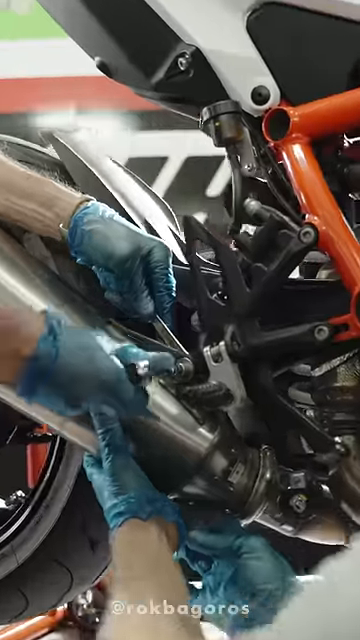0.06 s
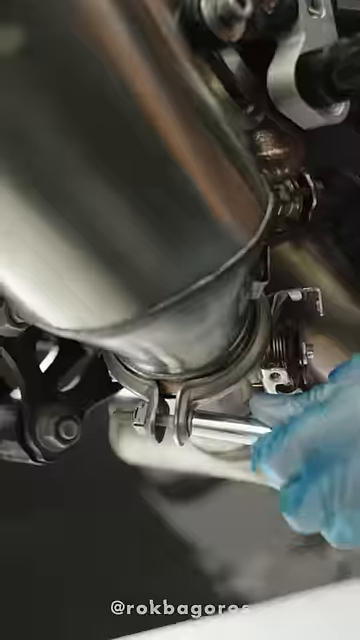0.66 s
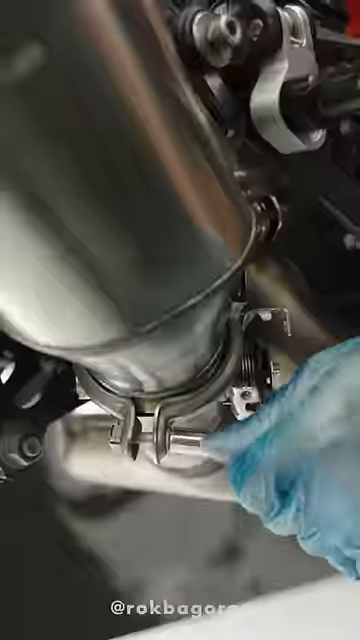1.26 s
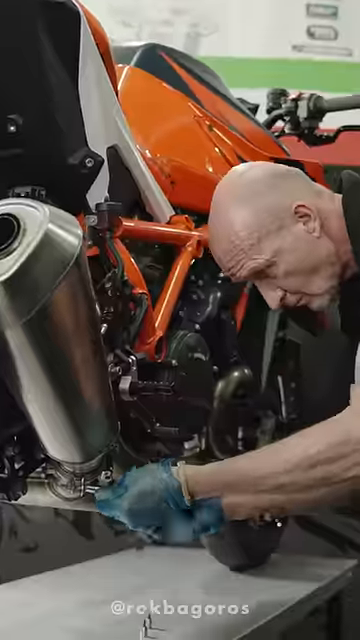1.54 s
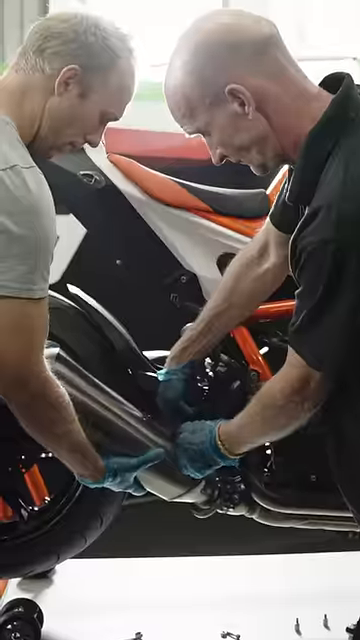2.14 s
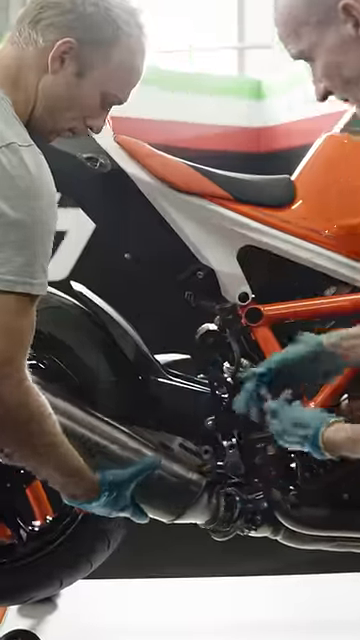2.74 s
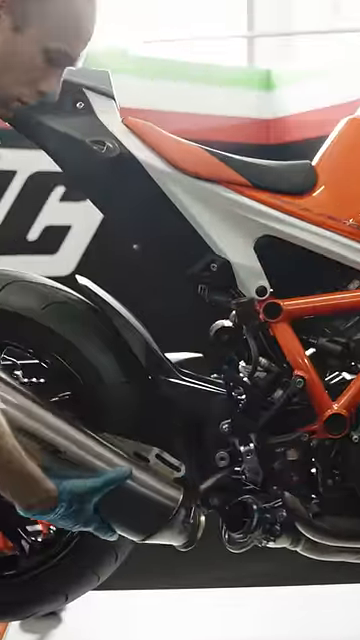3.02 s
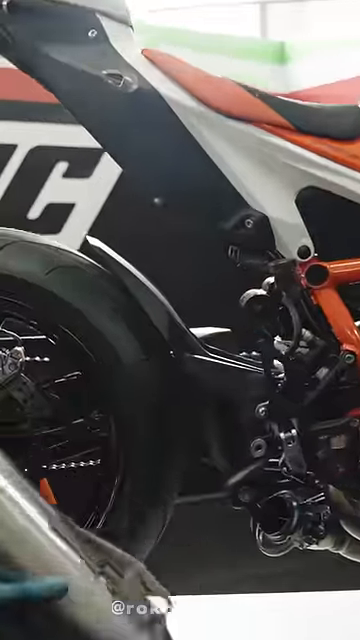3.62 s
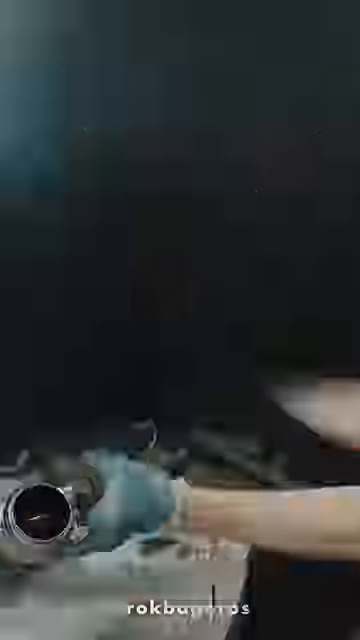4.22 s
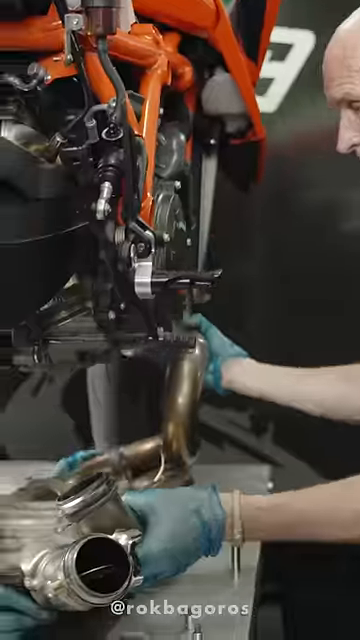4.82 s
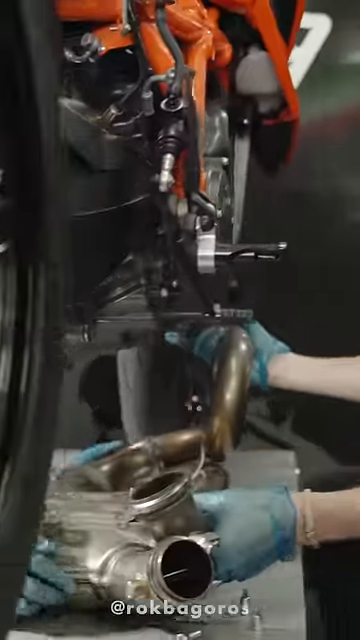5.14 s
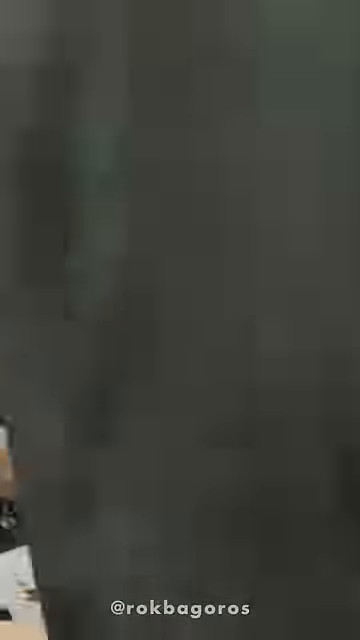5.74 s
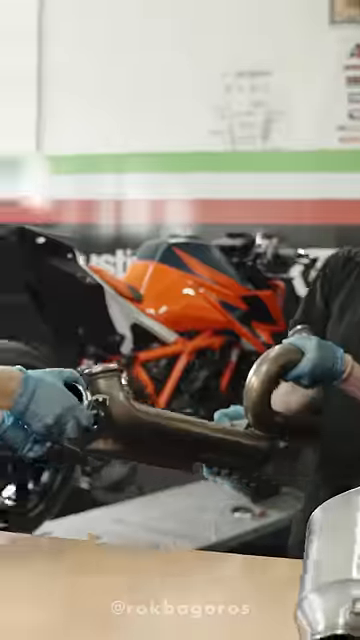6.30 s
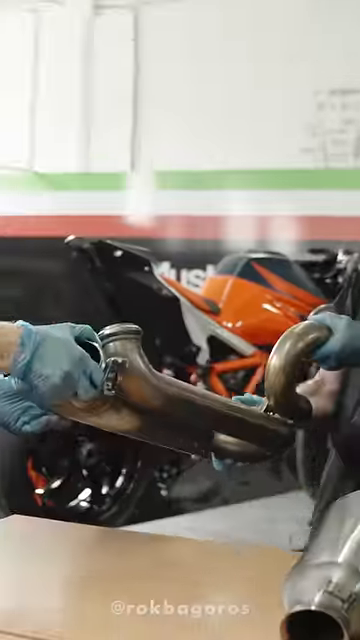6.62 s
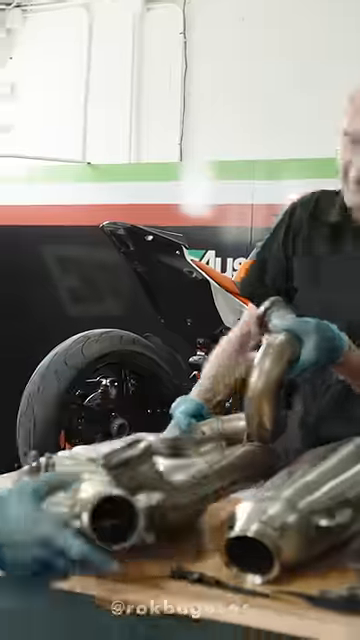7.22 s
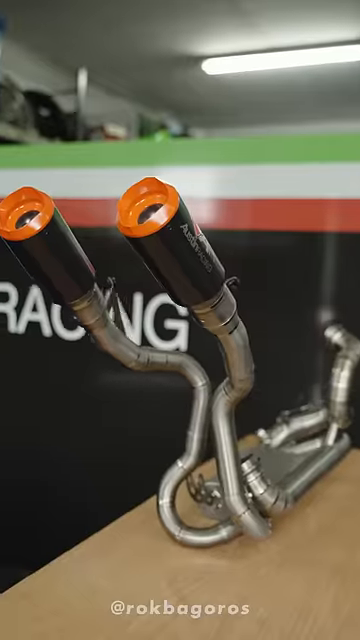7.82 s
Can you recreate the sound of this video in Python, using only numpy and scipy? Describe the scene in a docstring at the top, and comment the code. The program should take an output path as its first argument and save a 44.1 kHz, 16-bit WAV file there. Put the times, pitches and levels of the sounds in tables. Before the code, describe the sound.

A ratchet wrench clicks in quick bursts, then metal exhaust parts clatter loose and clank onto a wooden bench in a workshop.

```python
"""Light taps and the racing clicks of a ratchet wrench sound over a workshop's ventilation.
A motorcycle exhaust is being taken off, heard in short moments that break off abruptly. The wrench
swings back six times, its pawl striking each tooth; a tool clinks and the silencer knocks loose.
The steel collector box clatters free of the engine, then lands on a wooden bench. Each impact excites
a burst of quickly damped modes; the steel and the bench ring on, and the room reverberates."""
import sys
import numpy as np
from scipy import signal
from scipy.fft import rfft, irfft
from scipy.io import wavfile
from scipy.ndimage import uniform_filter1d

SR = 44100
rng = np.random.default_rng(int(sys.argv[2]) if len(sys.argv) > 2 else 0)


def dump(signal):
    """Clip the signal to [-1, 1] and save it as 16-bit WAV at the path in sys.argv[1]."""
    limited = np.clip(np.atleast_2d(signal).T, -1, 1)
    pcm = np.round(limited * 32767).astype(np.int16)
    wavfile.write(sys.argv[1], SR, pcm)


N = 346626
TIME = np.arange(N) / SR
# instants at which one moment gives way to the next
HANGER_END_S, CLAMP_END_S, PIPE_END_S = .676, 1.44, 2.076
SIDE_END_S, ENGINE_END_S, BENCH_END_S = 4.0, 6.315, 7.636


def from_db(db):
    """Amplitude ratio: tenfold for every 20 dB."""
    return 10 ** (np.asarray(db) / 20)


def unit(x):
    """Normalisation to an energy of one."""
    return x / np.sqrt(np.sum(x ** 2) + 1e-20)


def at_hz(points, hz):
    """Interpolation on a logarithmic frequency axis."""
    points_hz, values = np.transpose(points)
    return np.interp(np.log(np.maximum(hz, 1)), np.log(points_hz), values)


def decay(t60_s, t):
    """Exponential damping: the amplitude falls 60 dB in t60_s."""
    return np.exp(-np.log(1000) * t / max(t60_s, 1e-3))


def through(x, response):
    """Linear filtering: convolution with an impulse response."""
    return signal.oaconvolve(x, response)[:N]


def between(start_s, end_s):
    """Rectangular time window with millisecond ramps."""
    return uniform_filter1d(((TIME >= start_s) & (TIME < end_s)) * 1.0, size=64)


def soften(x, corner_hz):
    """One-pole low-pass: the treble falls about 6 dB per octave."""
    pole = np.exp(-2 * np.pi * corner_hz / SR)
    return signal.lfilter([1 - pole], [1, -pole], x)


def colour(spectrum, size=8192):
    """Minimum-phase response: folding the cepstrum makes the given spectrum causal."""
    bins_hz = np.arange(size // 2 + 1) * SR / size
    cepstrum = irfft(np.log(from_db(at_hz(spectrum, bins_hz))))
    cepstrum[1:size // 2] *= 2
    cepstrum[size // 2 + 1:] = 0
    return unit(irfft(np.exp(rfft(cepstrum))))


def in_room(x, direct_db, room_db, wall_hz):
    """Direct sound plus a diffuse field, which decays band by band and is dulled by wall absorption."""
    # reverberation time: frequency_hz, t60_s
    room_t60 = [(60, .8), (250, .7), (1000, .68), (4000, .64), (5500, .46), (8000, .34), (15000, .32)]
    t, tail = TIME[:SR], 0
    edges_hz = np.geomspace(30, 19000, 32)
    for low, high in zip(edges_hz, edges_hz[1:]):
        bandpass = signal.butter(2, [low, high], "band", fs=SR, output="sos")
        band = signal.sosfilt(bandpass, rng.standard_normal(SR))
        envelope = decay(at_hz(room_t60, np.sqrt(low * high)), t)
        energy = (high - low) * at_hz(room_t60, low)
        tail = tail + unit(band * envelope) * np.sqrt(energy)
    build_up = 1 - decay(.013, t)
    response = soften(unit(tail * build_up), wall_hz)
    return from_db(direct_db) * x + from_db(room_db) * through(x, response)


def struck(contacts, spectrum, t60_s, push_db):
    """Impact excitation: one push and a burst of dense, damped modes; a soft contact is duller."""
    out, body = np.zeros(N + SR), colour(spectrum)
    envelope = decay(t60_s, TIME[:SR // 4])
    for time_s, level_db, *brightness_hz in contacts:
        force = unit(rng.standard_normal(len(envelope)) * envelope)
        force[0] += from_db(push_db)
        burst = signal.fftconvolve(force, body)
        if brightness_hz:
            burst = soften(burst, brightness_hz[0])
        onset = max(round(time_s * SR), 0)
        out[onset:onset + len(burst)] += from_db(level_db) * unit(burst) * np.linalg.norm(envelope)
    return out[:N]


def with_ring(hits, contacts, modes, ring_db, spread=0, count=1):
    """Free vibration, added at ring_db relative to the hits; clusters of `count` close modes beat."""
    times_s, levels_db = np.transpose(contacts)[:2]
    onsets, ring = np.round(times_s * SR).astype(int), 0
    for mode_hz, mode_db, t60_s in modes:
        for offset in np.arange(count) - (count - 1) / 2:
            strengths = from_db(levels_db + mode_db + rng.normal(0, 1.3, len(onsets)))
            impulses = np.full(N, 1e-18)
            impulses[onsets] = strengths * rng.choice([-1, 1], len(onsets))
            detuned_hz = mode_hz * (1 + spread * offset * rng.uniform(.3, 1))
            radius, angle = decay(t60_s, 1 / SR), 2 * np.pi * detuned_hz / SR
            feedback = [1, -2 * radius * np.cos(angle), radius ** 2]
            ring = ring + signal.lfilter([0, np.sin(angle)], feedback, impulses)
    return hits + from_db(ring_db) * np.linalg.norm(hits) * unit(ring)


def rebounds(start_s, gap_s, level_db, loss_db, brightness_hz, count):
    """Inelastic collisions: a loose part touches again and again, unevenly, losing energy as it goes."""
    jitter_share, uneven_db = .06, 1
    return [(start_s + gap_s * (k + jitter_share * late),
             level_db - loss_db * k + uneven_db * harder, brightness_hz)
            for k, (late, harder) in enumerate(rng.standard_normal((count, 2)))]


def ventilation():
    """Broadband air noise, its level and spectrum set by the place, with mains hum at the first bolt."""
    # air spectrum at each working place: frequency_hz, level_db
    air_hanger = [(18, -56), (30, -22), (86, 3), (131, -11.5), (199, -6), (252, -16), (328, -2), (364, -21),
                  (394, -8.5), (780, -16.5), (3980, -22), (16000, -54)]
    air_clamp = [(18, -38.5), (30, -2), (161, -4), (266, -12.5), (303, -6), (426, -13.5), (486, -21),
                 (526, -12.5), (1430, -20.5), (1590, -23), (3580, -27.5), (16000, -42)]
    air_side = [(18, -76.5), (30, -33.5), (93, 1), (131, -13), (303, -17.5), (415, -23), (449, -18),
                (526, -23), (1810, -31), (16000, -48)]
    air_engine = [(26, -11.5), (85, -0.5), (125, -5.5), (300, -8.5), (450, -12.5), (1180, -12), (1900, -24),
                  (3700, -16.5), (5400, -31.5), (16000, -41)]
    air_bench = [(26, -46.5), (45, 8.5), (170, 5.5), (202, 4.5), (321, 1.5), (500, 1), (1100, -4.5),
                 (1710, -6.5), (2240, -9.5), (3080, -4), (16000, -33.5)]
    air_stand = [(35, -21), (91, -0.5), (145, -23), (206, -1), (290, -15.5), (2000, -25.5), (4000, -50),
                 (12000, -63)]
    # hum partials: pitch_hz, level_db
    partials = [(199.2, -46), (328.4, -58), (387.6, -56.5), (565.2, -58)]
    spectra = [air_hanger, air_clamp, air_side, air_engine, air_bench, air_bench, air_stand]
    levels_db = [-45, -52, -55.5, -54, -58.5, -54, -50.5]
    edges_s = [0, HANGER_END_S, PIPE_END_S, SIDE_END_S, ENGINE_END_S, 7.02, BENCH_END_S, N / SR]
    air = 0
    for spectrum, level_db, start_s, end_s in zip(spectra, levels_db, edges_s, edges_s[1:]):
        rush = through(rng.standard_normal(N), colour(spectrum))
        air = air + from_db(level_db) * rush * between(start_s, end_s)
    hum = sum(from_db(db) * np.sqrt(2) * np.sin(2 * np.pi * (hz * TIME + rng.random()))
              for hz, db in partials)
    return air + hum * between(0, HANGER_END_S)


def hiss_swells():
    """Resonant filtering of noise: soft swells of high hiss, with a few brief scrapes and squeaks."""
    # swelling bands of noise: start_s, end_s, centre_hz, bandwidth_hz, level_db
    bands = [(2.604, 2.724, 600, 350, -50), (3.09, 3.102, 13000, 5000, -65), (3.217, 3.32, 2500, 2500, -67),
             (3.2, 3.65, 12000, 9000, -77), (3.41, 3.44, 7000, 3000, -69), (4.3, 5.0, 8900, 8000, -68.5),
             (5.3, 5.802, 4180, 200, -58.5), (5.447, 5.8, 7600, 300, -66.5),
             (5.298, 5.8, 11300, 3500, -65.5), (5.8, 6.333, 1240, 200, -62), (6.626, 6.654, 2500, 450, -57),
             (7.008, 7.1, 10000, 9000, -70), (7.213, 7.65, 10900, 9100, -54)]
    out = np.zeros(N)
    for start_s, end_s, centre_hz, bandwidth_hz, level_db in bands:
        progress = np.clip((TIME - start_s) / (end_s - start_s), 0, 1)
        swell = np.sin(np.pi * progress).clip(0) ** .5
        resonance = signal.iirpeak(centre_hz, centre_hz / bandwidth_hz, fs=SR)
        hiss = signal.lfilter(*resonance, rng.standard_normal(N))
        out += from_db(level_db) * swell * hiss / hiss.std()
    return out


def handling():
    """Heavily damped impacts: light taps, a bolt put down and dull bumps die without ringing on."""
    # gloved hands and loose parts tapping the bike: start_s, level_db, brightness_hz
    tap_contacts = [(.002, -27.5, 9000), (.0915, -27, 4000), (.27, -31, 2200), (.30, -25.5, 1498),
                    (.3657, -33.5, 12000), (.381, -34, 3020), (.397, -33, 1502), (.581, -30, 2494),
                    (.62, -30, 1500), (.826, -30.5, 700), (1.426, -37, 6000), (2.1215, -46, 6000)]
    # a bolt on the lift table, and bumps of the carried box: start_s, level_db
    bolt_contacts = [(4.1883, -28), (4.194, -31)]
    bump_contacts = [(6.231, -40.5), (6.746, -44)]
    # spectrum of each kind of impact: frequency_hz, level_db
    tap_spectrum = [(100, -9), (300, -3), (900, 1), (2000, -6), (3500, 1.5), (6000, -13.5), (15000, -9)]
    bolt_spectrum = [(150, -7), (900, 0.5), (3000, -1.5), (4200, 0.5), (6000, -10), (8500, -8),
                     (11000, -22), (16000, -36)]
    bump_spectrum = [(60, -3), (180, 2), (400, -2.5), (1500, -22), (8000, -64)]
    taps = struck(tap_contacts, tap_spectrum, t60_s=.072, push_db=-9)
    bolt = struck(bolt_contacts, bolt_spectrum, t60_s=.061, push_db=-6)
    bumps = struck(bump_contacts, bump_spectrum, t60_s=.066, push_db=-8)
    return in_room(taps + bolt + bumps, direct_db=-3, room_db=-7.5, wall_hz=4000)


def tool():
    """A hard contact gives a bright clink; beating between close modes makes its ring shimmer."""
    # steel tool against the bracket: start_s, level_db, brightness_hz
    clinks = [(2.1655, -29, 12000), (2.171, -28.5, 6000)]
    # impact spectrum: frequency_hz, level_db
    spectrum = [(120, -51), (200, -34), (311, -6.5), (1060, -13.5), (1250, -5.5), (1770, -9.5),
                (2250, -3.5), (2750, -13.5), (3760, -4.5), (6400, -20), (7410, -7), (10500, -15.5),
                (14600, -11), (16000, -25)]
    # ringing modes: pitch_hz, level_db, t60_s
    modes = [(335, 0, .3), (1450, -4, .15), (2280, -2, .22), (3900, -7, .26), (7520, -7, .28),
             (9450, -2, .3), (14350, -13, .22)]
    hits = struck(clinks, spectrum, t60_s=.05, push_db=-9)
    rung = with_ring(hits, clinks, modes, ring_db=-10, spread=.015, count=7)
    return in_room(rung, direct_db=3.5, room_db=-2.5, wall_hz=5900)


def silencer():
    """Shell resonance: the can scuffs along its pipe and comes off with a hollow knock."""
    # can against pipe: start_s, level_db, brightness_hz
    knocks = [(2.635, -44, 2490), (2.66, -42, 2500), (2.713, -29.5, 9000), (2.727, -30, 2000),
              (2.75, -35.5, 2000)]
    # impact spectrum: frequency_hz, level_db
    spectrum = [(59, -58), (100, -26), (163, -11.5), (224, -26), (502, -3), (634, -12), (910, -14),
                (1010, -20), (1200, -14.5), (1450, -20.5), (2860, -18.5), (8110, -35), (16000, -38)]
    # ringing modes: pitch_hz, level_db, t60_s
    modes = [(410, -3, .22), (503, -3, .55), (705, -7, .85), (893, -9, .55), (1168, -16, .55),
             (1588, -15, .43), (1976, -16, .55), (4517, -17, .45), (8050, -19, .22)]
    hits = struck(knocks, spectrum, t60_s=.087, push_db=-16)
    rung = with_ring(hits, knocks, modes, ring_db=-6.5)
    return in_room(rung, direct_db=2, room_db=-3, wall_hz=6000)


def pawl_clicks(start_s, fastest_s, end_s, teeth, start_speed, end_speed, level_db, swell_db):
    """The pawl drops once per tooth, so click rate follows angular speed; top speed strikes hardest."""
    jitter_s, uneven_db = .0004, 1.33   # no two teeth are quite alike
    stages_s, t = [start_s, fastest_s, end_s], np.arange(start_s, end_s, 1 / SR)
    speed = np.exp(np.interp(t, stages_s, np.log([start_speed, 1, end_speed])))
    angle = np.cumsum(speed)
    tooth_angles = np.linspace(angle[0], angle[-1], round(teeth))
    times_s = np.interp(tooth_angles, angle, t)
    levels_db = level_db - swell_db * np.interp(times_s, stages_s, [1, 0, 1])
    scatter = rng.standard_normal((len(times_s), 2)) * [jitter_s, uneven_db]
    return np.column_stack([times_s, levels_db]) + scatter


def swings(start_s, end_s, spectrum, t60_s):
    """Structural coupling: the bolted part colours the pawl's clicks, and the grip decides what rings."""
    # back-swings, with speeds as shares of the top speed: start_s, fastest_s, end_s, teeth,
    # start_speed, end_speed, level_db, swell_db, ring_hz, ring_db, ring_t60_s
    strokes = [(0.2807, .298, .3122, 6, 0.64, 0.54, -20.5, 2, 3000, -21, 0.035),
               (0.599, .624, .6337, 6, .42, .25, -21, 4, 3300, -9, 0.035),
               (0.8059, .839, .9069, 15, 0.089, 0.078, -19, 7, 7010, -7, .028),
               (1.1941, 1.262, 1.291, 14, 0.36, 0.071, -22.5, -0.5, 12200, -9, 0.034),
               (1.4623, 1.524, 1.5795, 19, .51, .38, -25.5, 7.5, 4330, -10.5, 0.11),
               (1.865, 1.905, 1.9535, 17, .55, 0.39, -23.5, 7.5, 3070, -6.5, 0.035)]
    out = 0
    for *motion, ring_hz, ring_db, ring_t60_s in strokes:
        if start_s <= motion[0] < end_s:
            clicks = pawl_clicks(*motion)
            hits = struck(clicks, spectrum, t60_s, push_db=-11)
            out = out + with_ring(hits, clicks, [(ring_hz, 0, ring_t60_s)], ring_db, spread=.018, count=5)
    return out


def ratchet():
    """Impulse trains from two back-swings on each of three bolts excite the parts they hold."""
    # spectrum of each part's short-lived modes: frequency_hz, level_db
    on_hanger = [(470, -28), (800, -1.5), (1500, -16.5), (1660, -4.5), (2000, -7), (2840, -9.5),
                 (3300, -3.5), (4240, -5), (5050, -21), (5870, -10.5), (7540, -16), (14300, -5.5),
                 (16000, -16)]
    on_clamp = [(240, -34.5), (420, -18), (540, -2.5), (760, -15), (1200, -15.5), (1800, -5), (2700, -5.5),
                (3250, -0.5), (4200, -2.5), (5700, -13), (6950, -6), (8400, -11), (12500, -2),
                (16000, -9.5)]
    on_pipe = [(350, -63), (600, -49), (894, -9), (1190, -37), (1310, -18), (1430, -14.5), (2680, -10),
               (3120, -6), (3340, -4), (4280, -9), (5790, -19.5), (7110, -5.5), (9110, -15.5), (13000, -5),
               (16000, -16.5)]
    hanger = swings(0, HANGER_END_S, on_hanger, t60_s=.015)
    clamp = swings(HANGER_END_S, CLAMP_END_S, on_clamp, t60_s=.021)
    pipe = swings(CLAMP_END_S, PIPE_END_S, on_pipe, t60_s=.016)
    return (in_room(hanger, direct_db=1, room_db=-8.5, wall_hz=8000) * between(0, HANGER_END_S)
            + in_room(clamp, direct_db=1.5, room_db=-11.5, wall_hz=7000)
            + in_room(pipe, direct_db=.5, room_db=-6.5, wall_hz=12170) * between(0, PIPE_END_S))


def collector():
    """Repeated impacts drive the steel box's modes as it drops free and rattles against its mounts."""
    # box coming off the engine: start_s, level_db, brightness_hz
    clatter = [(4.9644, -24, 9000), (4.976, -23, 3970), (5.0495, -21, 14000), (5.0499, -13.5, 330),
               (5.0593, -10.5, 11960), (5.120, -15, 6990)]
    # impact spectrum: frequency_hz, level_db
    spectrum = [(24, -62.5), (40, -24), (118, -7), (167, -3.5), (290, -4.5), (422, -4), (503, -7),
                (630, -5), (1340, -8.5), (2570, -12.5), (2840, -14), (4030, -10), (4930, -16),
                (7540, -14.5), (16000, -32.5)]
    # ringing modes: pitch_hz, level_db, t60_s
    modes = [(153, -3, .5), (183, -2, .3), (226, 0, .35), (409, -3, .45), (635, -4, .4), (1700, -8, .35),
             (2331, -7, .34), (3460, -11, .45), (4020, -9, .55)]
    rattle = rebounds(start_s=5.076, gap_s=.0098, level_db=-15, loss_db=1, brightness_hz=9000, count=7)
    contacts = clatter + rattle
    hits = struck(contacts, spectrum, t60_s=.06, push_db=-8)
    rung = with_ring(hits, contacts, modes, ring_db=-13, spread=.03, count=2)
    return in_room(rung, direct_db=3, room_db=-2, wall_hz=9030)


def bench():
    """Soundboard radiation: the box lands and rocks, and the wooden top booms under the clank."""
    # one end of the box lands, then the other: start_s, level_db, brightness_hz
    landing = [(7.2643, -5, 2980), (7.322, -9, 9000)]
    # impact spectrum: frequency_hz, level_db
    spectrum = [(30, -21), (52, -15), (76, -7), (102, -7.5), (160, -3.5), (260, -3.5), (330, -1),
                (420, -11.5), (560, -12), (830, -9), (1250, -18), (1750, -16.5), (2800, -25), (4200, -24),
                (5500, -36.5), (15000, -44)]
    # ringing modes: pitch_hz, level_db, t60_s
    modes = [(78, 4, .7), (125, -3, .5), (164, 0, .6), (247, -4, .5), (309, -2, .4), (338, -4, .5),
             (559, -7, .6), (629, -8, .4), (825, -8, .42), (1133, -7, .3), (1265, -11, .4), (1342, -11, .4),
             (1690, -16, .55), (4000, -22, .6)]
    rocking = rebounds(start_s=7.292, gap_s=.0345, level_db=-17, loss_db=.5, brightness_hz=5500, count=6)
    contacts = landing + rocking
    hits = struck(contacts, spectrum, t60_s=.058, push_db=-3)
    rung = with_ring(hits, contacts, modes, ring_db=-6.5)
    return in_room(rung, direct_db=-.5, room_db=.5, wall_hz=9200) * between(0, BENCH_END_S)


def scene():
    """Superposition: the pressures of all sources add at one point."""
    return (ratchet() + handling() + hiss_swells() + tool() + silencer()
            + collector() + bench() + ventilation())[None]


def record(dry):
    """Soft saturation rounds the highest peaks, and a steep low-pass limits the bandwidth."""
    ceiling, cutoff_hz = .9, 15900
    rounded = dry / (1 + (dry / ceiling) ** 6) ** (1 / 6)
    return signal.sosfilt(signal.ellip(12, .1, 90, cutoff_hz, fs=SR, output="sos"), rounded)


dry = scene()
out = record(dry)
dump(out)
```